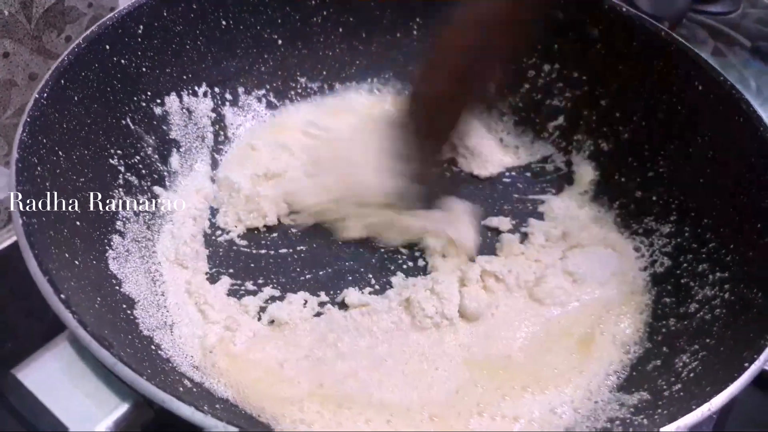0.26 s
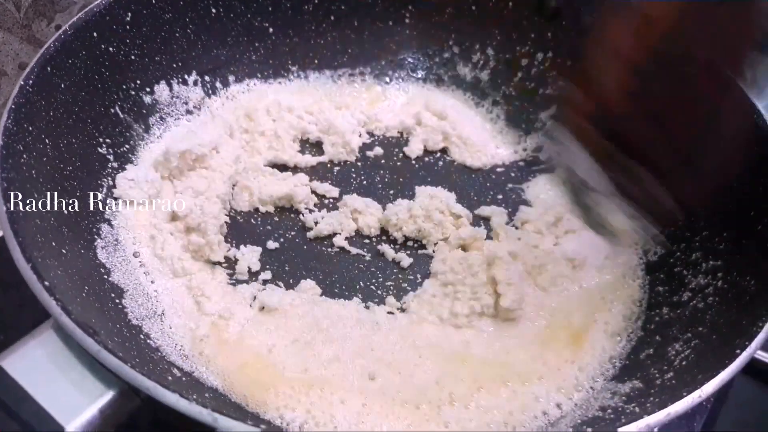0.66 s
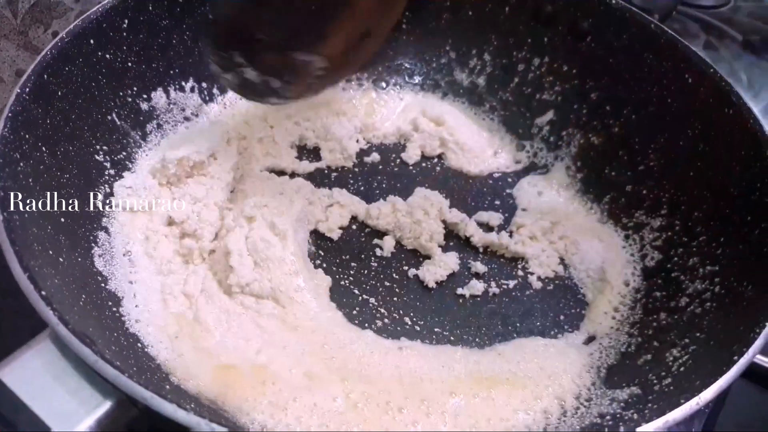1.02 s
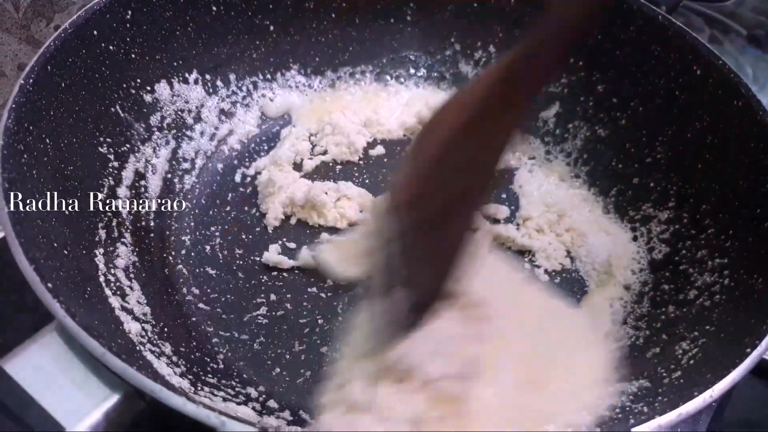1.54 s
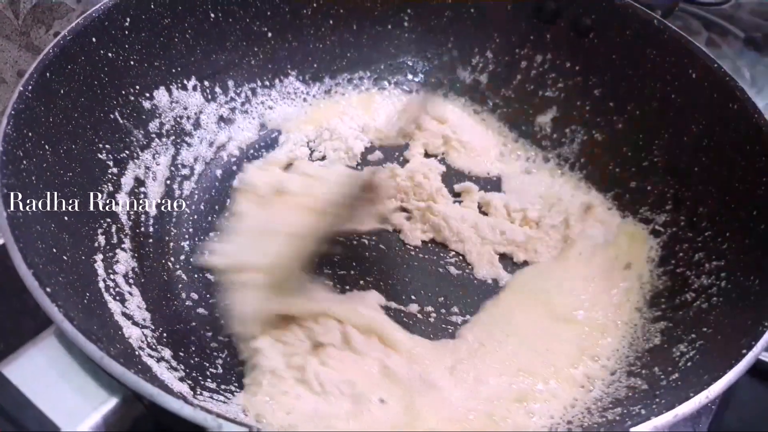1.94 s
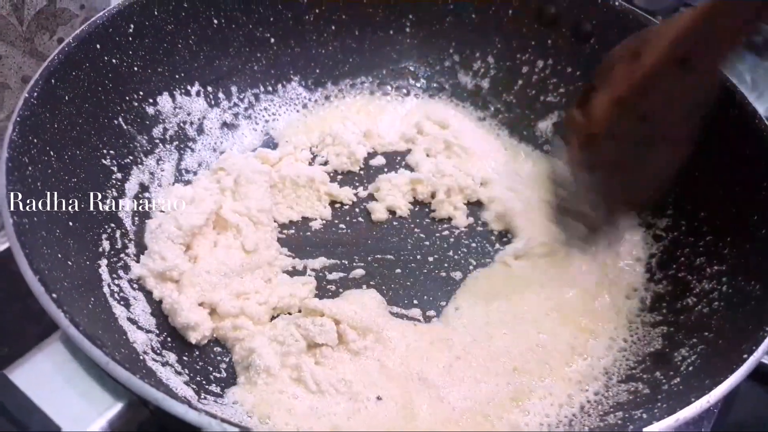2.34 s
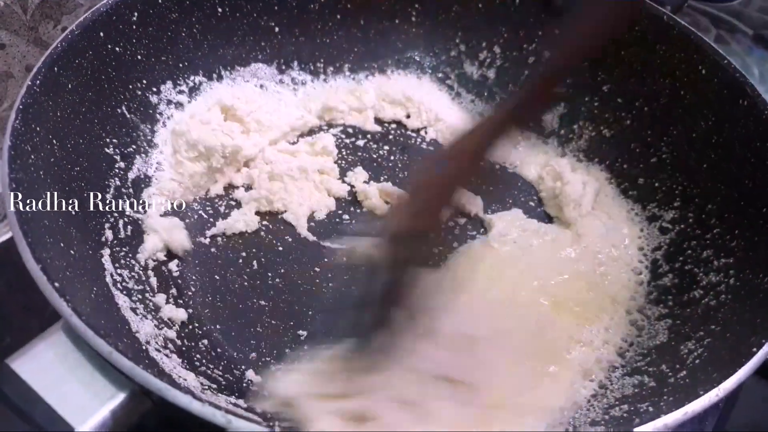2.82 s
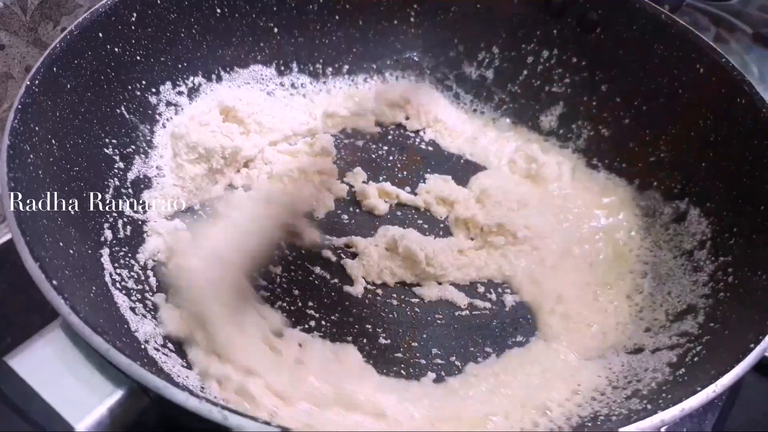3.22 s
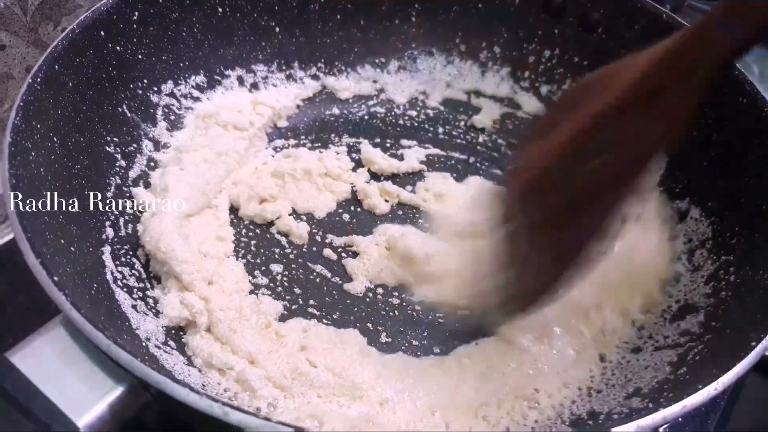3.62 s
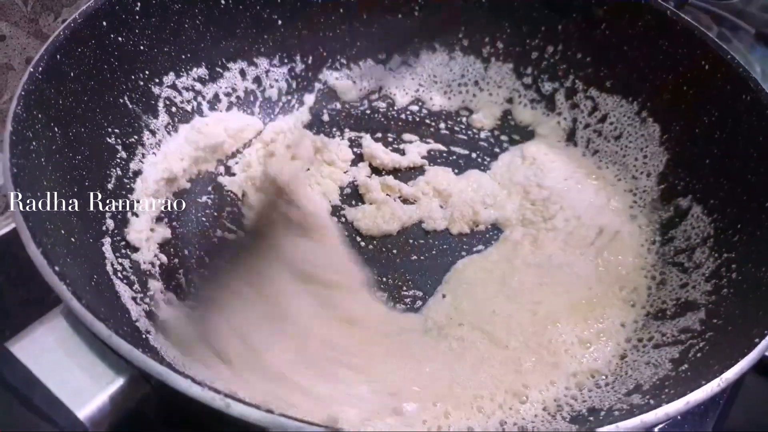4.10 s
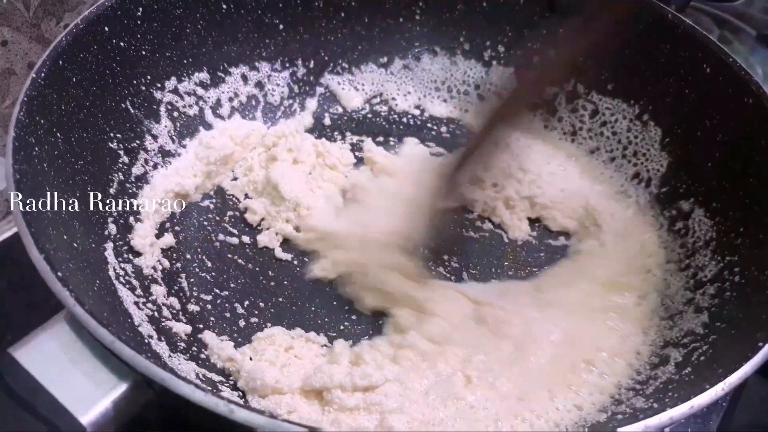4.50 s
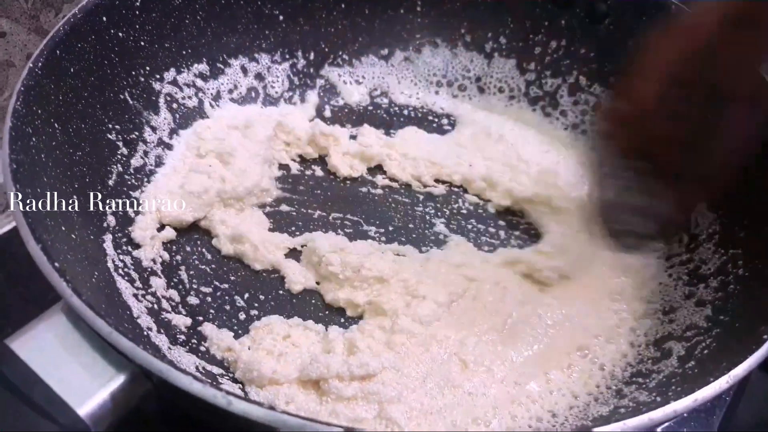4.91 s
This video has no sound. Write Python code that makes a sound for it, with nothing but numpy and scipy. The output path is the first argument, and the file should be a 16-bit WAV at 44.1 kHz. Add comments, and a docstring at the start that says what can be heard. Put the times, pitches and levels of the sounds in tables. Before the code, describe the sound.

Bright, fine frying hiss with tiny pops continues without break. Over it a wooden blade lands, clacks and slides on a metal pan, making hollow ringing scrapes and dull soft pushes of wet grain. Contacts cluster near three seconds and carry on unevenly to the end. Close microphone, slight small-room reflection, low background rumble.

```python
"""Fat sizzles close by as a sweep of the blade dies away; then knocks, grinding and soft pushes follow.
A wooden spatula stirs semolina in hot ghee in a small kitchen.
Sizzle: noise grains and ringing pops, flaring where wet paste meets bare hot metal.
Grinding, paste and drags: random grains through pan resonances, shaped by tables of hand strokes.
Contacts: short pushes and bursts drive the pan; decaying sines are the wood."""
import sys
import numpy as np
from scipy import signal
from scipy.fft import rfft, irfft, next_fast_len
from scipy.io import wavfile
from scipy.ndimage import uniform_filter1d, map_coordinates

SR = 44100
rng = np.random.default_rng(int(sys.argv[2]) if len(sys.argv) > 2 else 0)


def to_wav(sig):
    """Store sig (one row per channel, or 1-D mono) as 16-bit WAV at the path in sys.argv[1].

    Samples outside -1..1 are clipped; the rate is SR.
    """
    pcm = np.clip(np.atleast_2d(sig), -1, 1) * 32767
    pcm = np.round(pcm).astype(np.int16)
    wavfile.write(sys.argv[1], SR, pcm.T)  # frames by channels


N = 227718
TOP_HZ = 15450


def amp(db):
    """Decibels to gain."""
    return 10 ** (np.asarray(db) / 20)


def unit(x):
    """Scale to rms 1."""
    return x / np.sqrt(np.mean(x ** 2) + 1e-20)


def since(s):
    """Seconds since the moment s, per sample."""
    return np.arange(N) / SR - s


def along(points, hz):
    """(Hz, value) points interpolated on a log frequency axis."""
    f, v = np.transpose(points)
    return np.interp(np.log(hz + 1), np.log(f + 1), v)


def wobble(rate):
    """Smooth random curve, rate knots/s."""
    return map_coordinates(rng.standard_normal(int(N * rate / SR) + 4), [np.arange(N) * rate / SR])


def filtered(x, response):
    """x times a complex response of frequency."""
    size = 2 * next_fast_len(N)
    return irfft(rfft(x, size) * response(np.fft.rfftfreq(size, 1 / SR)), size)[..., :N]


def coloured(x, spectrum):
    """x through a causal minimum-phase filter, built by folding the cepstrum."""
    def response(hz):
        cepstrum = irfft(np.log(amp(along(spectrum, hz))))
        half = len(cepstrum) // 2
        folded = np.r_[cepstrum[0], 2 * cepstrum[1:half], np.zeros(half)]
        return np.exp(rfft(folded))
    return filtered(x, response)


def resonate(x, modes):
    """x through parallel damped resonances of alternating sign."""
    def response(f):
        total = 0
        for k, (centre, width, db) in enumerate(modes):
            damping = 1j * f * width
            total = total + (-1) ** k * amp(db) * damping / (centre * centre - f * f + damping)
        return total
    return filtered(x, response)


def shifting(x, modes, sway_db, rate):
    """Resonances whose strengths wander at random within +-sway_db."""
    out = np.zeros(N)
    for k, mode in enumerate(modes):
        out += resonate(x, [mode]) * (-1) ** k * amp(sway_db * np.tanh(wobble(rate)))
    return out


def steady(x, window_s=0.035):
    """Level to rms 1 over short windows; colour and fine grain keep changing."""
    size = round(window_s * SR)
    power = uniform_filter1d(uniform_filter1d(x ** 2, size), size)
    return x / np.sqrt(np.abs(power) + 1e-20)


def drifting(x, depth, rate):
    """Pitch wander by resampling at a speed of 1 + depth * wobble."""
    position = np.cumsum(1 + depth * wobble(rate))
    return map_coordinates(x, [position], mode="mirror")


def grains(rate, scatter_db):
    """Unequal impulses at random moments, rate/s, scaled to rms 1."""
    chance, size, sign = rng.random(N), rng.standard_normal(N), rng.choice([-1, 1], N)
    return unit((chance < rate / SR) * sign * amp(scatter_db * np.clip(size, -2, 2)))


# Stove and kitchen noise spectrum: f/Hz, relative level/dB
KITCHEN_SPECTRUM = [(25, -69), (55, -16), (100, -4.5), (165, 5.5), (400, -26), (3000, -23.5)]


def background():
    """Low noise of the stove and kitchen, wavering in level."""
    return amp(-57.0 + 3.5 * wobble(10.0)) * unit(coloured(rng.standard_normal(N), KITCHEN_SPECTRUM))


# Wall decay: f/Hz, t60/s
ROOM_DECAY = [(150, 0.043), (1500, 0.16), (12000, 0.055)]


def room(x):
    """Diffuse wall answer: decaying noise tails, crossfaded so that the pattern changes."""
    out = np.zeros(N)
    centres, step = np.linspace(0, N, 16, retstep=True)
    for centre in centres:
        hz, t, z = signal.stft(rng.standard_normal(SR // 3), SR, nperseg=256)
        decay = amp(-60 * t / along(ROOM_DECAY, hz)[:, None])
        tail = signal.istft(z * decay, SR, nperseg=256)[1]
        fade = np.sqrt(np.clip(1 - np.abs(np.arange(N) - centre) / step, 0, 1))
        out += signal.oaconvolve(x * fade, tail / np.linalg.norm(tail))[:N]
    return out


BUMP_S, BUMP_HZ, BUMP_DB, BUMP_LENGTH_S = 5.069, 77, -35, 0.0089


def bump():
    """One soft deep thud as the pan shifts on its stand: a sine under a Gaussian."""
    t = since(BUMP_S)
    return amp(BUMP_DB) * np.exp(-(t / BUMP_LENGTH_S) ** 2) * np.sin(2 * np.pi * BUMP_HZ * t)


POPS_PER_S, POP_HZ, POP_SPREAD_OCTAVES, POP_DECAY_CYCLES = 130, 7500, 0.63, 1.8
POP_DB = -12.5  # relative to the hiss


def pops(size=128):
    """Bursting bubbles, each a sine decaying over a few cycles at its own pitch."""
    chance, pitch, strength = rng.random(N), rng.standard_normal(N), rng.standard_normal(N)
    at = np.flatnonzero(chance < POPS_PER_S / SR)
    hz = np.minimum(POP_HZ * 2 ** (POP_SPREAD_OCTAVES * pitch[at]), TOP_HZ)
    cycles = hz[:, None] * np.arange(size) / SR
    strengths = amp(2.5 * np.clip(strength[at, None], -2, 2))
    rings = strengths * np.exp(-cycles / POP_DECAY_CYCLES) * np.sin(2 * np.pi * cycles)
    samples = at[:, None] + np.arange(size)
    return unit(np.bincount(samples.ravel(), rings.ravel(), N)[:N])


# Hiss spectrum of bursting steam: f/Hz, relative level/dB
FAT_SPECTRUM = [(300, -56), (1000, -30), (2700, -3), (3600, 0), (5000, 1.5), (5900, -3), (6900, 1.5),
                (7600, 6), (9400, 4.5), (11800, 1), (14000, 1), (15300, -6)]


def sizzle(level_db):
    """Steam bubbles bursting in the fat: fine hiss plus sharper single pops."""
    hiss = unit(coloured(grains(rate=20000, scatter_db=0.5), FAT_SPECTRUM))
    return amp(level_db + 0.39 * wobble(50)) * (hiss + amp(POP_DB) * pops())


def pressed(times, lengths, levels_db, shape):
    """Power of presses: fast attack, release as the hand eases off."""
    attack_s, length_share, steepness = shape
    power = np.zeros(N + SR)
    t = np.arange(SR) / SR
    for s, length, db in zip(times, lengths, levels_db):
        release = np.exp(-(t / (length_share * length)) ** steepness)
        power[round(s * SR):][:SR] += (amp(db) * (1 - np.exp(-t / attack_s)) * release) ** 2
    return power[:N]


def swelled(times, lengths, levels_db, shape, fall=1):
    """Power of swells; fall is fall time over rise time."""
    power = np.zeros(N)
    for s, length, db in zip(times, lengths, levels_db):
        u = since(s) / length
        power += (amp(db) * np.exp(-np.maximum(-u, u / fall) ** shape)) ** 2
    return power


DIP_S, DIP_DB = 0.071, -3


def dipped():
    """Brief dip in the scraping level just before each press, 0 to 1."""
    ahead = [-since(s) / DIP_S for s, *_ in PRESSES]
    return np.max([(u > 0) * np.exp(-u ** 2) for u in ahead], axis=0)


# Blade lands or bites, then slides: t/s, slide/s, paste, grind, pan ring, sizzle level/dB,
# knock, clack, click, wood drive/dB, wood f/Hz. Levels and drives precede the layer gains.
PRESSES = [(0.2245, 0.059, -40.5, -43, -42.5, -37.5, -36, -21, -11.5, -15.5, 1780),
           (0.4914, 0.071, -44, -48, -45, -54, -33.5, -20, -20, -17.5, 1920),
           (0.8423, 0.07, -36.5, -33.5, -37, -38.5, -41, -32, -21, -40, 2350),
           (1.1645, 0.1, -38.5, -47.5, -45.5, -39, -36, -32, -16, -17, 2250),
           (1.499, 0.047, -43, -43.5, -40, -54, -38, -16.5, -38, -11.5, 1170),
           (1.8206, 0.093, -33, -38.5, -31.5, -40.5, -22.8, -30, -18, -21, 2110),
           (1.968, 0.1, -44, -47, -62, -40.5, -54, -16.5, -24, -15, 1330),
           (2.409, 0.15, -41, -45.5, -47, -39, -37, -18.5, -20.5, -29, 1800),
           (3.1636, 0.078, -38, -34.5, -31, -40, -35, -9.5, -30, -3.5, 1660),
           (3.3154, 0.051, -41, -44.5, -46, -41, -38, -10.5, -23, -10.5, 1820),
           (3.647, 0.097, -42, -42, -33.5, -48, -51, -23, -36, -19, 1700),
           (3.9778, 0.082, -34, -44.5, -40, -43, -30, -15.5, -9, -13.5, 1890),
           (4.262, 0.055, -44, -44, -38.5, -40.5, -51, -19, -38, -18.5, 1200),
           (4.489, 0.074, -35.5, -40.5, -32.5, -43, -23, -30, -23, -24, 2120),
           (5.081, 0.043, -36, -34, -34, -36, -36, -20.5, -16, -21, 1900)]
# Blade sweeps round the pan: peak t/s, build-up/s, paste, grind, pan ring, sizzle level/dB
SWEEPS = [(0.015, 0.088, -57.5, -50, -54.5, -41), (0.297, 0.015, -48, -46, -35, -48),
          (0.596, 0.052, -57, -38.5, -40.5, -37.5), (0.848, 0.025, -60, -46, -52, -35.5),
          (1.01, 0.16, -49.5, -53, -66, -41), (1.475, 0.16, -47.5, -46.5, -65, -40.5),
          (1.76, 0.2, -56, -55, -56, -61), (2.238, 0.056, -49, -39, -37.5, -34),
          (2.521, 0.044, -54, -38.5, -27, -41), (2.772, 0.027, -59, -46, -58, -44),
          (3.0, 0.24, -49, -45.5, -45.5, -66), (3.149, 0.024, -39.5, -42, -44, -36.5),
          (3.575, 0.1, -50.5, -39.5, -54, -36), (3.758, 0.067, -50, -36, -24, -38),
          (4.07, 0.048, -50, -45.5, -38, -48), (4.39, 0.05, -57, -47, -46, -60),
          (4.61, 0.12, -48.5, -50.5, -44, -44), (4.861, 0.051, -55.5, -47, -55, -36)]
# Wet paste on bare hot metal, fat flares: peak t/s, half length/s, level/dB
FLARES = [(0.405, 0.3, -41.5), (1.618, 0.15, -41.5), (2.095, 0.029, -39), (2.762, 0.016, -32),
          (2.818, 0.19, -33.5), (3.504, 0.27, -36), (3.833, 0.043, -36.5), (4.076, 0.053, -34),
          (4.204, 0.15, -37), (4.71, 0.34, -42.5)]
# Fat left alone: t/s, level/dB
SIMMER = [(0, -44), (0.8, -48.5), (2.2, -42.5), (5.16, -45.5)]
RESTING_GRIND_DB, RESTING_RING_DB, RESTING_PASTE_DB = -57.5, -66, -65  # blade drifting between strokes
# Press response: attack/s, length over slide, release steepness
PASTE_PRESS, GRIND_PRESS = (0.0032, 1, 0.9), (0.006, 2.14, 2.4)
RING_PRESS, SIZZLE_PRESS = (0.0093, 2.11, 1.43), (0.0069, 1.83, 3.8)
SWELL_SHAPE, RING_SWELL_SHAPE = 2.4, 1.63  # 1 = pointed with long skirts, 2 = rounded
SWEEP_FALL = 0.77  # fall over build-up time


def stirring_levels():
    """Paste, grind, ring and sizzle in dB: powers of rest, presses and sweeps add; stirring wakes the fat."""
    s, slide, paste_db, grind_db, ring_db, fat_db, *_ = np.transpose(PRESSES)
    peak, rise, sweep_paste_db, sweep_grind_db, sweep_ring_db, sweep_fat_db = np.transpose(SWEEPS)

    def stirred(rest_db, press_db, press_shape, sweep_db, swell_shape=SWELL_SHAPE):
        presses = pressed(s, slide, press_db, press_shape)
        return amp(rest_db) ** 2 + presses + swelled(peak, rise, sweep_db, swell_shape, SWEEP_FALL)

    simmer_db = np.interp(since(0), *np.transpose(SIMMER))
    push = stirred(RESTING_PASTE_DB, paste_db, PASTE_PRESS, sweep_paste_db)
    grind = stirred(RESTING_GRIND_DB, grind_db, GRIND_PRESS, sweep_grind_db)
    ring = stirred(RESTING_RING_DB, ring_db, RING_PRESS, sweep_ring_db, RING_SWELL_SHAPE)
    fat = stirred(simmer_db, fat_db, SIZZLE_PRESS, sweep_fat_db)
    flares = swelled(*np.transpose(FLARES), SWELL_SHAPE)
    blade_db = 10 * np.log10([push, grind, ring]) + DIP_DB * dipped()
    return *blade_db, 10 * np.log10(fat + flares)


# Low pan modes: f/Hz, width/Hz, gain/dB
PAN_BODY = [(101.5, 8.9, -6), (176, 50, -16), (218.6, 8.2, -5.5), (300, 68, -4), (342, 57, -6),
            (401, 58, -2.5), (515, 44, -6.5), (561, 18.6, -1), (643, 48, -6.5)]
# Low knock spectrum: f/Hz, relative level/dB
KNOCK_SPECTRUM = [(35, -46), (70, -19), (105, -25), (150, -9), (210, -6), (300, 1.5), (480, 1.5), (750, -6),
                  (1300, -32.5), (4000, -55)]


def paste(level_db):
    """Soft lumps dragged along excite only low pan modes and a low thump."""
    drag = grains(rate=1200, scatter_db=4.5) * amp(2.0 * wobble(110))
    body = amp(3.5) * steady(shifting(drag, PAN_BODY, sway_db=8.0, rate=12))
    return amp(level_db) * (body + amp(-7.0) * unit(coloured(drag, KNOCK_SPECTRUM)))


# A heap of paste pushed along: start t/s, length/s, level/dB
DRAGS = [(1.21, 0.37, -44.5), (2.613, 0.2, -41.5), (3.422, 0.13, -43.5), (4.07, 0.13, -40),
         (4.75, 0.076, -48)]
HOLLOW_START_HZ, HOLLOW_END_HZ, HOLLOW_WIDTH_HZ = 328, 610, 230


def drags(count=4):
    """Paste rub with a resonance that climbs, by crossfade, as the hollow behind the blade closes."""
    rub = grains(rate=750, scatter_db=2.0) * amp(2.4 * wobble(110))
    hollows = [[(hz, HOLLOW_WIDTH_HZ, 0)] for hz in np.linspace(HOLLOW_START_HZ, HOLLOW_END_HZ, count)]
    tones = [unit(resonate(resonate(rub, mode), mode)) for mode in hollows]
    body = amp(-12.0) * unit(resonate(rub, PAN_BODY))
    out = np.zeros(N)
    for s, length, db in DRAGS:
        progress = np.clip(since(s) / length, 0, 1)
        hollow = np.zeros(N)
        for k, tone in enumerate(tones):
            hollow += tone * np.sqrt(np.clip(1 - np.abs(progress * (count - 1) - k), 0, 1))
        out += amp(db) * np.sqrt(np.abs(np.sin(np.pi * progress))) * (hollow + body)
    return out


# Middle and upper pan modes: f/Hz, width/Hz, gain/dB
PAN_RING = [(691, 48, -4.5), (816.4, 38, 2.5), (881, 46, -5)]
PAN_UPPER = [(1144, 200, -2.5), (1346, 43, -2.5), (1444, 76, -4), (1643, 94, 7.5), (1790, 163, 2),
             (2263, 88, 0), (2313, 97, -1), (2563, 24, -0.5), (3020, 34, -9.5), (3533, 88, -6),
             (3807, 95, -7.5)]
# Grit spectrum: f/Hz, relative level/dB
GRIT_SPECTRUM = [(200, -30.5), (400, -9), (600, -7), (1000, -2.5), (1700, 1.5), (2050, -4), (2400, -1.5),
                 (2800, -10), (4600, -11), (6500, -11), (14000, -59.5)]
CRACKS_PER_S, CRACK_DB = 110, -7  # dB relative to the crush
RING_DRIFT_DEPTH, RING_DRIFT_PER_S = 0.00898, 7  # the blade loads the pan and bends its ring


def scrape(grind_db, ring_db):
    """Trapped grains catch and slip, shaking the pan; single hard grains snap."""
    grip = wobble(130)
    crush = unit(grains(rate=2400, scatter_db=4.0) * amp(2.04 * grip))
    crush = crush + amp(CRACK_DB) * grains(rate=CRACKS_PER_S, scatter_db=-0.5)
    hiss = amp(-1.0) * unit(coloured(crush, GRIT_SPECTRUM))
    upper = amp(1.0) * steady(shifting(crush, PAN_UPPER, sway_db=13.0, rate=24))
    ring = steady(shifting(grains(rate=2000, scatter_db=2.5), PAN_RING, sway_db=6.0, rate=27))
    ring = drifting(ring, RING_DRIFT_DEPTH, RING_DRIFT_PER_S)
    return amp(grind_db) * (hiss + upper) + amp(ring_db) * ring


def blows(times, levels_db, t60, rise):
    """Noise-burst force at each contact, as grains under the blade give way."""
    t = np.arange(SR // 10) / SR
    force = np.zeros(N + SR)
    for s, db in zip(times, levels_db):
        burst = rng.standard_normal(len(t)) * amp(-60 * t / t60) * (1 - np.exp(-t / rise))
        force[round(s * SR):][:len(t)] += amp(db) * burst / np.linalg.norm(burst)
    return force[:N]


WOOD_T60_S, WOOD_RISE_S = 0.021, 0.00056
WOOD_TIP_HZ, WOOD_TIP_DB = 2503, -10  # stiff tip; dB relative to the main mode


def wood(times, levels_db, pitches_hz):
    """Short spatula ring: one mode pitched by where it touches, one fixed tip mode."""
    t = np.arange(SR // 10) / SR
    tip = amp(WOOD_TIP_DB) * np.sin(2 * np.pi * WOOD_TIP_HZ * t)
    ring = np.zeros(N + SR)
    for s, db, hz in zip(times, levels_db, pitches_hz):
        envelope = amp(db - 60 * t / WOOD_T60_S) * (1 - np.exp(-t / WOOD_RISE_S))
        ring[round(s * SR):][:len(t)] += envelope * (np.sin(2 * np.pi * hz * t) + tip)
    return ring[:N]


# Blade skips over a lump: t/s, knock, clack, click, wood drive/dB, wood f/Hz
SKIPS = [(0.155, -58, -38, -21, -42, 1650), (0.8722, -53, -10.5, -18, -13, 1580),
         (0.9384, -36, -20, -38, -22, 1770), (1.8403, -30, -19, -44, -15, 1620),
         (1.895, -40, -29, -44, -26, 1450), (2.519, -57, -33, -38, -16.5, 1590),
         (2.7055, -28.5, -35, -45.5, -31, 1820), (2.9312, -66, -20.5, -54, -17.5, 1160),
         (3.013, -40, -20.5, -25, -21, 1400), (3.2154, -32.5, -21, -42, -14, 1370),
         (3.443, -32, -27, -42, -30, 1390), (3.5374, -56, -16, -28, -18, 1680),
         (3.709, -52, -25, -20, -30, 1900), (3.7307, -46, -20, -34, -13, 1450),
         (4.3784, -54, -25, -38, -21.5, 1880), (4.842, -52, -22, -34, -17.5, 1970)]
# Gritty click spectrum: f/Hz, relative level/dB
CLICK_SPECTRUM = [(800, -33), (2500, -8), (3700, -7.5), (6000, -9.5), (8000, -3.5), (11000, -6.5),
                  (15500, -16)]


def contacts():
    """Wood meets metal at presses and skips: low push, pan clack, gritty click, wood ring."""
    landings = np.array(PRESSES)[:, [0, 6, 7, 8, 9, 10]]
    s, knock_db, clack_db, click_db, wood_db, hz = np.vstack([landings, SKIPS]).T
    push = np.bincount(np.round(s * SR).astype(int), amp(knock_db), N)
    knock = amp(38.5) * coloured(push, KNOCK_SPECTRUM) + amp(32.0) * resonate(push, PAN_BODY)
    hit = blows(s, clack_db, t60=0.047, rise=0.0005)
    clack = coloured(hit, GRIT_SPECTRUM)
    clack = clack + amp(22) * resonate(hit, PAN_UPPER) + amp(17) * resonate(hit, PAN_RING)
    click = amp(17.0) * coloured(blows(s, click_db, t60=0.025, rise=0.0019), CLICK_SPECTRUM)
    return knock + clack + click + amp(-6.0) * wood(s, wood_db, hz)


# Side gain of the room: f/Hz, gain/dB
SIDE_GAIN = [(100, -23), (500, -31.5), (2000, -33), (8000, -20.5)]


def scene():
    """Pan straight ahead; only the room gives a little width."""
    paste_db, grind_db, ring_db, fat_db = stirring_levels()
    stirring = scrape(grind_db, ring_db) + paste(paste_db) + drags() + contacts()
    pan = stirring + sizzle(fat_db) + bump() + background()
    mid = pan + amp(-9.5) * room(pan)
    side = coloured(room(pan), SIDE_GAIN)
    return np.array([mid + side, mid - side])


def record(dry):
    """Nothing is kept above the band limit."""
    return filtered(dry, lambda hz: hz < TOP_HZ)


dry = scene()
out = record(dry)
to_wav(out)
```